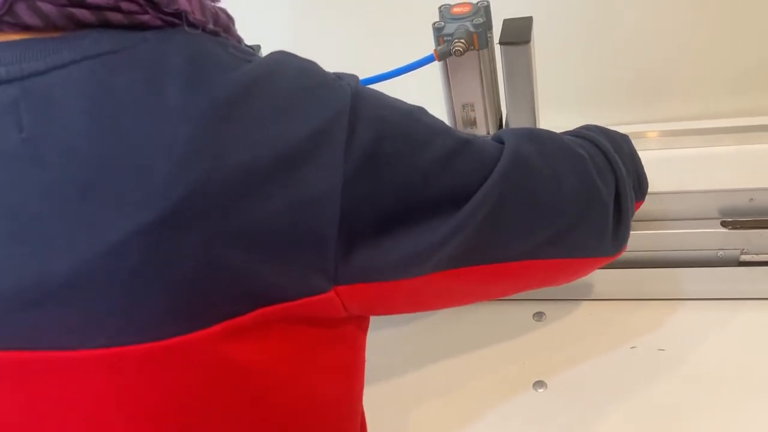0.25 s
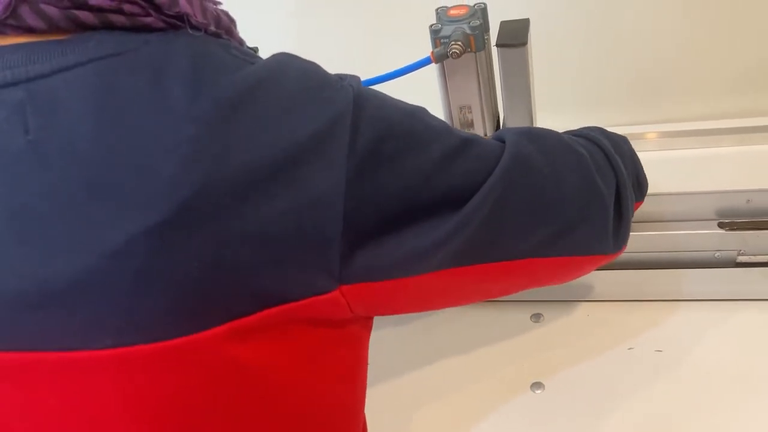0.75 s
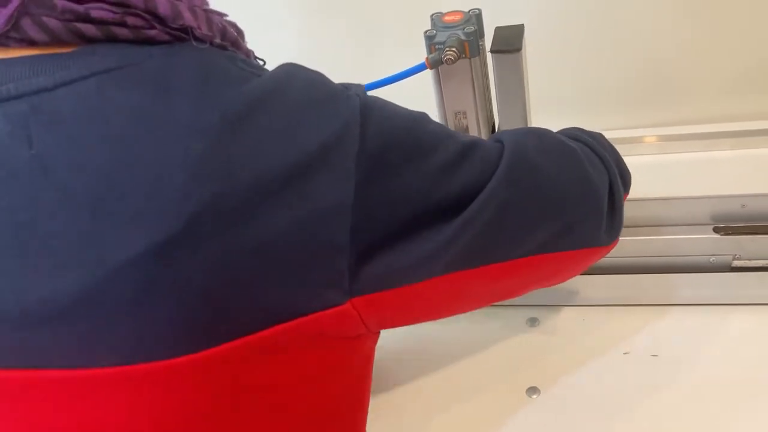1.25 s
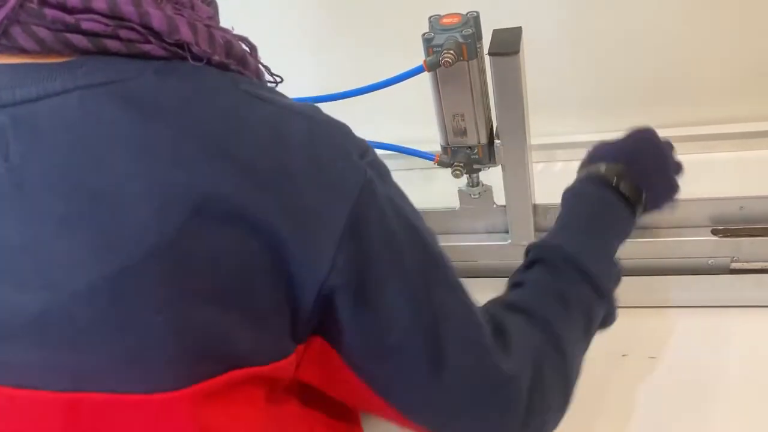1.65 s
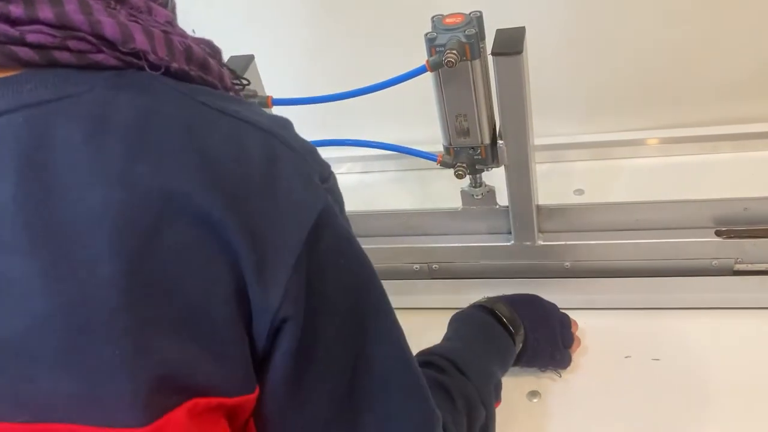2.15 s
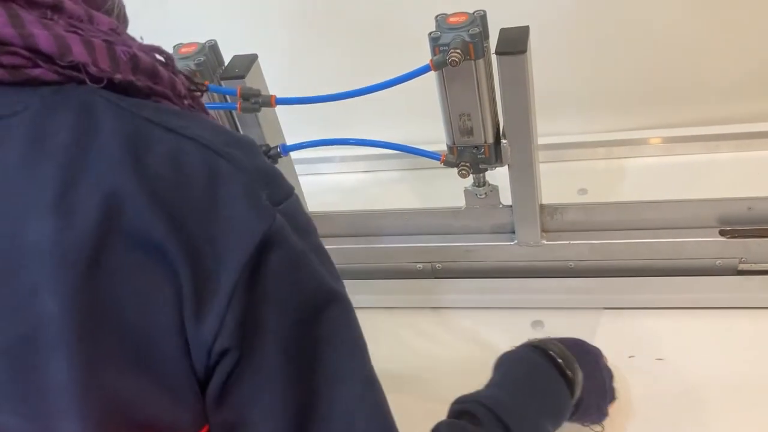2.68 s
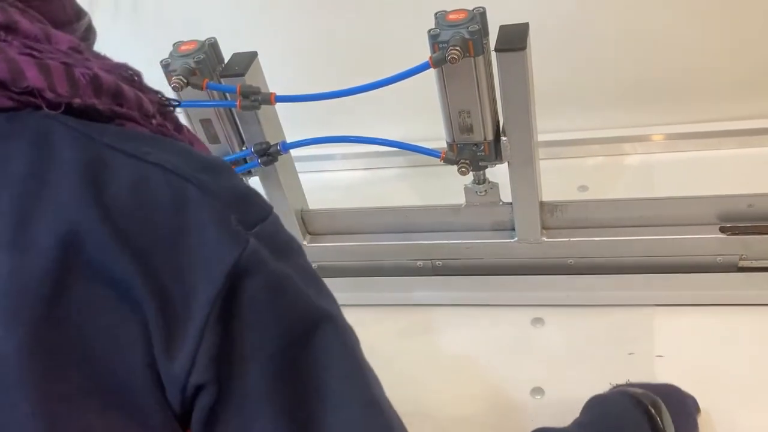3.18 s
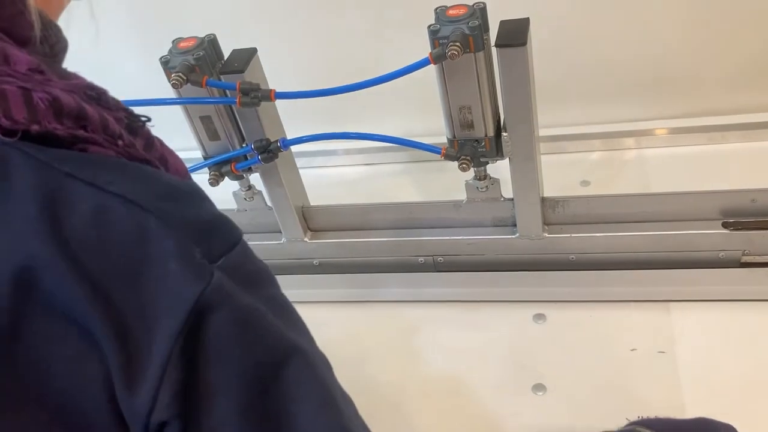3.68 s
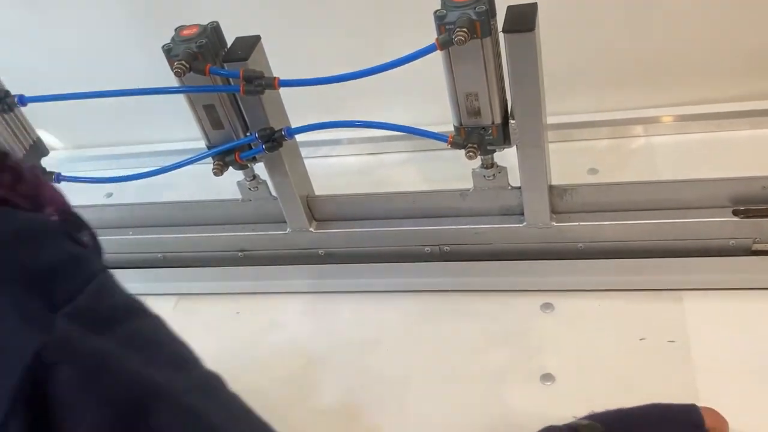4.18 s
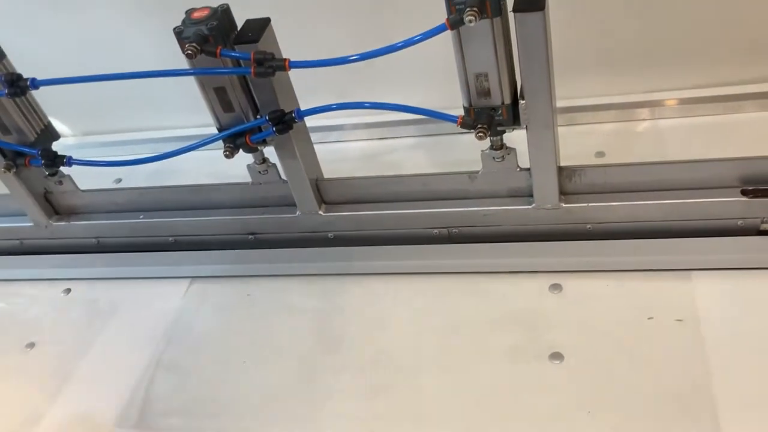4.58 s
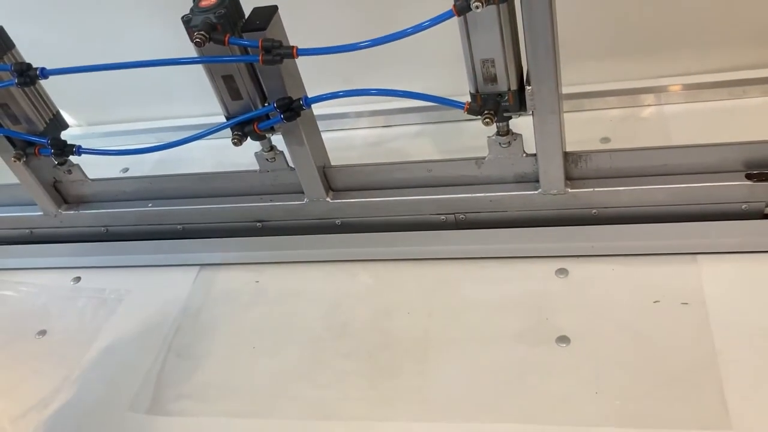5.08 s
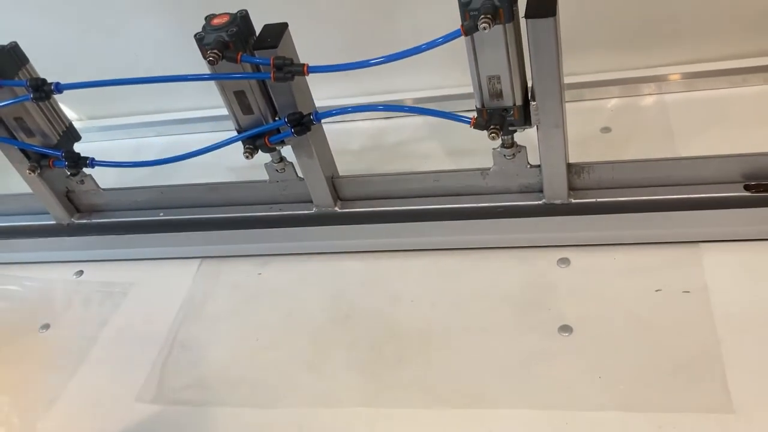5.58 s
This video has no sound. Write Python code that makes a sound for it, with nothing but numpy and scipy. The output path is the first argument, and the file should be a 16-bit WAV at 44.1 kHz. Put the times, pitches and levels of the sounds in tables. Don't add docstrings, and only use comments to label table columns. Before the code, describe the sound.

A low, faint workshop hum runs throughout, heard close up in stereo in a hard-walled room. From 0 to 2.2 seconds hands and sleeves brush plastic film: small dry fizzes, scrapes and brittle snaps in uneven strokes, with a tiny clink at 0.64, the film springing up near 1.25 and a busier cluster of creases and soft knocks around 1.4 to 1.6. A click at 2.23 leads into a quick, bright pull of the sheet across the table from 2.4, with a second tug around 3, fading by 3.7. It is nearly quiet until a pedal thumps at 4.57 with a dull metallic knock; a small clack follows at 4.94. At 5.2 valves snap open: loud airy hiss, ringing clinks and deep frame thuds. The piston rumbles and rattles around 5.5, then a second sharp burst and clunks hit at 5.67 to 5.8, still hissing at the cut-off.

```python
import sys
import numpy as np
from scipy import signal
from scipy.fft import rfft, irfft, next_fast_len
from scipy.io import wavfile
from scipy.ndimage import uniform_filter1d

SR = 44100
rng = np.random.default_rng(int(sys.argv[2]) if len(sys.argv) > 2 else 0)


def voltage_ratio(level):
    return 10 ** (np.asarray(level, float) / 20)


def dump(signal):
    limited = np.clip(np.atleast_2d(signal).T, -1, 1)
    pcm = np.round(limited * 32767).astype(np.int16)
    wavfile.write(sys.argv[1], SR, pcm)


N = 257103

# frequency_hz, density_db
FILM_SPECTRUM = [(700, -3), (2000, -2.5), (3500, -2.5), (5500, -1), (7500, 2.5), (9500, 6), (12000, -1.5),
                 (16000, -9)]
SLEEVE_SPECTRUM = [(300, 15.5), (600, 0), (1200, 6.5), (2200, 6.5), (4000, 3.5), (8000, -4.5), (16000, -50)]
DRAG_SPECTRUM = [(200, -55), (350, 3.5), (550, 0), (800, 3.5), (1500, -12), (16000, -23)]
# middle_s, half_length_s, fizz_db, scrape_db
SWEEPS = [(.002, 0.018, -58, -55), (0.053, 0.034, -72, -52), (0.143, 0.051, -62.5, -58),
          (0.195, 0.038, -56, -58.5), (0.232, 0.038, -57, -53.5), (0.312, 0.04, -55.5, -48.5),
          (0.39, 0.037, -62, -54), (0.454, 0.048, -67, -57), (0.499, 0.059, -67, -58),
          (0.71, 0.087, -61.5, -54), (0.823, 0.053, -68, -57), (0.928, 0.071, -56, -55.5),
          (1.334, 0.033, -52.5, -55), (1.4, 0.037, -60, -60), (1.444, 0.022, -59, -57.5),
          (1.513, 0.041, -53, -50), (1.712, 0.18, -59, -57.5), (1.85, 0.046, -59, -56.5),
          (1.903, 0.063, -63.5, -54.5), (2.025, 0.066, -64.5, -72), (2.22, 0.076, -65.5, -64.5),
          (2.441, 0.084, -55, -46.5), (2.915, 0.11, -65, -49.5), (3.636, 0.071, -55, -80),
          (3.918, 0.11, -72, -88), (4.17, 0.065, -66, -61.5), (4.7, 0.065, -63, -73),
          (4.945, 0.03, -63.5, -59.5), (5.182, .008, -56, -68)]
# start_s, fizz_db, scrape_db, t60_s
JOLTS = [
    (0.636, -71, -47, 0.14),
    (1.255, -54, -51, 0.28),
    (2.234, -61, -52.5, 0.96),
    (4.573, -55.5, -48.5, 0.49),
    (4.936, -52.5, -44, 0.24),
]
# time_s, speed_db
PULL = [
    (2.26, -63.5),
    (2.46, -40.5),
    (2.53, -45),
    (2.86, -47),
    (2.96, -56),
    (3.05, -52),
    (3.4, -49.5),
    (3.55, -58),
    (3.76, -70),
]
# middle_s, half_length_s, level_db
BUNDLE_DRAGS = [(0.239, 0.017, -46), (0.957, 0.024, -51), (1.15, 0.066, -62), (1.335, 0.17, -52),
                (1.488, 0.013, -38.5), (1.592, 0.04, -44.5), (1.753, 0.12, -54), (0.08, 0.043, -53),
                (1.95, .04, -64), (2.693, 0.1, -63), (3.0, 0.1, -49.5), (3.25, 0.25, -50),
                (4.15, 0.046, -56.5), (4.3, 0.088, -75)]
# shared_delay_ms, own_delay_ms, level_db
ECHOES = [(1.901, 2.6, -10), (4.3, 3.7, -9), (7.106, 8.3, -8.5), (11.28, 9.9, -9.5), (15.81, 17.2, -9.5),
          (22.48, 20.6, -11.5)]

# frequency_hz, density_db
CRACK_SPECTRUM = [(300, 6), (1000, 3.5), (3000, 0), (7000, 7.5), (12000, 1.5), (17000, 0.5)]
# start_s, crack_db, ring_db, pitch_hz
SNAPS = [(.041, -44, -43, 4370), (.130, -46, -63, 6030), (.317, -46, -43, 1600),
         (0.395, -53, -40.5, 4580), (.4575, -37.5, -46, 6500), (1.3876, -35, -46, 11000),
         (1.4189, -33.5, -45, 7400), (1.256, -42, -45, 2920), (1.482, -40, -39.5, 1730),
         (1.498, -47, -55, 3520), (1.512, -42, -60, 1510), (1.564, -45, -43.5, 1600),
         (1.593, -36.5, -47, 2840), (1.669, -54, -42.5, 7100), (1.906, -45, -36, 7860),
         (1.998, -45, -46.5, 4230), (2.233, -31, -33, 10900), (2.936, -38, -40, 1680),
         (5.683, -25, -15.5, 10900)]
# start_s, crack_db, ring_db, pitch_hz, sharpness_q
CLINKS_AND_CREASES = [(0.638, -39, -42.5, 1930, 18), (.647, -62, -49, 1990, 27), (4.573, -58, -45.5, 1445, 45),
                      (4.569, -62, -35.5, 351, 11.5), (4.572, -61, -45.5, 915, 26), (4.597, -70, -41.5, 94.8, 33),
                      (4.935, -32.5, -44, 2100, 18), (4.938, -31.5, -41, 1320, 11), (5.202, -35, -22, 7400, 29),
                      (5.2037, -36, -13.5, 7030, 67), (5.214, -38, -23, 7200, 31), (5.212, -40, -21, 1410, 6.8),
                      (5.214, -33, -25, 590, 15), (5.22, -60, -27, 270, 5.1), (5.696, -50, -27, 390, 5),
                      (4.578, -70, -39, 183, 7.5), (4.597, -70, -39, 330, 8), (5.692, -23, -28, 1450, 5),
                      (5.6735, -26, -27, 3300, 3), (5.7358, -60, -20.5, 240, 2.6), (5.782, -18, -35, 1710, 400),
                      (2.2325, -50, -43.5, 970, 2.2),
                      (0.292, -60, -45, 1800, 5), (0.3007, -55, -45, 1600, 3), (0.306, -60, -48, 1900, 5),
           (0.3135, -58, -41, 1250, 4), (0.322, -56, -48, 2500, 4), (0.643, -60, -49, 1900, 12),
           (0.650, -60, -47, 2300, 8), (1.4265, -50, -52, 6800, 4), (1.388, -60, -46, 15200, 8),
           (2.86, -60, -48, 1900, 4), (2.90, -60, -49, 1500, 4), (2.955, -60, -49, 2000, 4),
           (4.573, -70, -46, 700, 22), (4.575, -70, -49, 1620, 40), (4.578, -70, -49, 1305, 35),
           (4.574, -70, -38, 298, 14), (4.64, -70, -43, 301, 14), (5.222, -60, -31, 4800, 30),
           (5.243, -60, -32, 4800, 25), (5.694, -50, -24, 3050, 8.6), (5.676, -60, -30, 2460, 20),
           (5.698, -62, -29, 750, 5.4), (5.6735, -30, -23, 7000, 2.5), (5.6735, -50, -29, 2100, 12),
           (0.637, -46, -42, 1950, 9), (4.581, -70, -39, 180, 9), (4.662, -70, -45, 330, 12),
           (5.2225, -60, -24, 290, 5), (2.925, -60, -47, 1150, 4), (4.70, -70, -49, 190, 10),
           (5.673, -22, -24, 4400, 3), (0.6315, -60, -49, 1800, 4), (5.648, -70, -33, 105, 5),
           (5.195, -50, -48, 5900, 6), (5.784, -40, -28, 4800, 12), (5.703, -40, -27, 4000, 4)]

# frequency_hz, density_db
JET_SPECTRUM = [(300, -16.5), (900, -14.5), (1600, -8.5), (3000, -10), (4500, -2.5), (6000, -8),
                (9000, -7.5), (12000, -3.5), (13500, -17), (16000, -8)]
BURST_SPECTRUM = [(300, -12), (1500, -4.5), (2300, 1), (3400, -8), (4800, 2.5), (5700, -19), (7000, 1),
                  (12000, 1.5), (13500, -8), (16000, -6.5)]
# pitch_hz, width_hz, level_db
MUFFLER_MODES = [(2420, 120, -7.5), (3500, 98, -34), (4450, 170, -19), (5000, 1100, 3), (6240, 150, -11),
                 (6570, 190, -9), (7140, 250, 1), (8440, 590, -0.5), (10340, 480, 0), (11390, 160, -3),
                 (12600, 170, -13)]
# centre_hz, width_hz, depth (0-1)
MUFFLER_GAPS = [(3370, 450, 1), (5600, 500, .85), (3000, 1100, .55)]
# start_s, burst_db, t60_s, muffler_ring (0-1)
VALVES = [
    (5.199, -27, 0.14, 0.1),
    (5.201, -19.5, 0.18, 0.1),
    (5.215, -22.5, 0.14, 0.97),
    (5.6743, -18, 0.1, 0),
    (5.69, -19.5, 0.24, 0.3),
    (5.782, -19.5, 0.065, 0),
]
# start_s, flow_db, rise_s, sag_db_per_s
PORTS = [
    (5.199, -27.5, .045, -3),
    (5.68, -29, 0.014, -15),
]

# start_s, force_db, height (0 legs, 1 table, 2 long beams, 3 short beams), clamp_db
BLOWS = [(1.49, -47, 1.1, -59), (1.576, -40.5, 1.05, -50), (4.568, -28, 4.8, -44), (4.582, -37.5, 2.5, -41),
         (4.578, -36, 1.2, -70), (4.594, -34, 1.37, -70), (4.601, -41, 3.3, -62), (4.633, -39, 0.74, -65),
         (4.664, -44, 0.82, -64), (5.21, -23.5, 3.57, -28.5), (5.219, -19, 2.25, -33),
         (5.235, -22.5, 0.68, -43), (5.256, -18, 1.51, -31.5), (5.266, -23, 0.84, -51),
         (5.291, -43, 0.76, -37), (5.512, -33, 0.99, -31), (5.525, -32, 0.99, -27.5),
         (5.537, -27.5, 0.87, -31.5), (5.583, -34, 0.83, -38), (5.61, -39.5, 0.47, -44),
         (5.64, -34.5, 0.27, -52), (5.694, -24.5, 1.36, -21), (5.698, -21, 2.33, -28),
         (5.71, -24, 0.22, -52), (5.724, -23, 2.05, -44), (5.726, -29.5, .1, -60), (5.737, -38, 2.5, -34),
         (5.782, -36, 0.65, -27.5), (5.800, -25, 1.0, -29.5), (5.802, -37, 4.5, -60)]
# time_s, rumble_db
TRAVEL = [
    (5.199, -51),
    (5.3, -62),
    (5.4, -52),
    (5.5, -37.5),
    (5.6, -43.5),
    (5.67, -59),
    (5.72, -44.5),
    (5.78, -42),
    (5.83, -27.5),
]
# pitch_hz, level_db, t60_s
LEG_MODES = [(60.5, 7, 0.095), (76.7, 4, 0.14), (99, -8, 0.26)]
TABLE_MODES = [(153.3, -5, 0.23), (171.6, -5, 0.27)]
LONG_BEAM_MODES = [(226.5, -3.5, 0.13), (259, 5, 0.044)]
SHORT_BEAM_MODES = [(300.6, 4, 0.08), (342.4, 9, 0.12), (405, -5, 0.16), (526, -13, 0.032)]
CLAMP_MODES = [(590, 1.5, 0.015), (774, 4.5, 0.017), (920, -4.5, 0.045), (1264, 5, 0.022),
               (1395, -3.5, 0.06), (1600, -3.5, 0.071), (1710, -19, 0.24), (2000, -21, 0.12),
               (2040, -33, 0.09), (2430, -21, 0.14)]

# frequency_hz, t60_s
WALLS = [(100, 0.43), (500, 0.22), (2000, 0.32), (8000, 0.35), (16000, 0.053)]
# frequency_hz, density_db
SHOP_SPECTRUM = [(12, -23), (20, 9.5), (187, -12), (301, -7), (347, -9.5), (399, -10.5), (873, -17.5),
                 (1150, -13.5), (2080, -29.5), (7110, -78), (9140, -31), (10800, -90), (16000, -72)]
# pitch_hz, width_hz, level_db
DRONES = [(58.6, 21.5, -57), (189.2, 22.4, -56.5), (339.9, 10.5, -60.5), (1780, 160, -73)]

# frequency_hz, correlation (0-1)
PORT_LIKENESS = [(60, .9), (300, .86), (700, .5), (2000, .2), (5500, .25), (6800, .85), (8000, .7),
                 (8850, .98), (9250, .999), (9600, .97), (10300, .66), (11400, .9), (12500, .58),
                 (13200, .96), (13600, .995), (14100, .9), (14800, .55), (15700, .92)]
# frequency_hz, left_minus_right_db
PORT_BALANCE = [(60, -0.5), (300, -2), (700, 0), (3000, 1), (8000, 0)]
# frequency_hz, gain_db
MIC_RESPONSE = [(15, -36), (30, -7), (45, 0)]


def rustle():
    crackle = voltage_ratio(3.4 * np.minimum(rng.exponential(1, N), 5)) * (rng.random(N) < 700 / SR)
    crackle = signal.lfilter([1], [1, -.9], crackle) * rng.standard_normal((2, N))
    fizz = noise(FILM_SPECTRUM, patchy_db=0.3, flicker_db=0.2) + 0.42 * evened(colour(crackle, FILM_SPECTRUM))
    scrape = noise(SLEEVE_SPECTRUM, patchy_db=2.5, flicker_db=0.5)
    drag = noise(DRAG_SPECTRUM, patchy_db=3.5, flicker_db=1.5)

    film, sleeve = handling()
    pull = track(PULL, column=1) ** 2
    bundle = sum(voltage_ratio(db) ** 2 * swell(s, half) for s, half, db in BUNDLE_DRAGS)
    wander = uniform_filter1d(uniform_filter1d(rng.standard_normal(N), size=1200), size=1200)
    lumps = voltage_ratio(1.5 * evened(wander))
    table_gain = lumps * np.sqrt(voltage_ratio(-19.5) ** 2 * sleeve + voltage_ratio(-11.5) ** 2 * pull + bundle)
    fizz_gain = np.sqrt(film + pull)
    scrape_gain = np.sqrt(sleeve + voltage_ratio(-18.5) ** 2 * pull)
    return (voltage_ratio(2.5) * fizz_gain * bounced(fizz)
            + voltage_ratio(3.5) * scrape_gain * bounced(scrape)
            + voltage_ratio(-6.5) * table_gain * bounced(drag))


def handling():
    power = voltage_ratio([[-78.5], [-70]]) ** 2
    for s, half, fizz_db, scrape_db in SWEEPS:
        power = power + voltage_ratio([[fizz_db], [scrape_db]]) ** 2 * swell(s, half)
    for s, fizz_db, scrape_db, t60 in JOLTS:
        power = power + (voltage_ratio([[fizz_db], [scrape_db]]) * burst(s, t60, rise=0.0031)) ** 2
    return power


def swell(s, half):
    t = np.arange(0, N, 32) / SR
    bell = np.exp(-2 * abs((t - s) / half) ** 2.33)
    return np.repeat(bell, 32)[:N]


def bounced(x):
    taps = np.zeros((2, SR // 30))
    taps[:, 0] = 1
    for k, (*ms, db) in enumerate(ECHOES):
        taps[[0, 1], np.round(np.array(ms) * SR / 1000).astype(int)] += (-1) ** k * voltage_ratio(db)
    return signal.oaconvolve(x, taps / np.linalg.norm(taps[0]), axes=1)[:, :x.shape[1]]


def ticks():
    rows = [(*row, 4.3, 0.058 * (3000 / row[-1]) ** 0.68) for row in SNAPS]
    rows += [(*row, 0.055 + 1.7 * row[4] / row[3]) for row in CLINKS_AND_CREASES]
    length = 9000
    out = np.zeros((2, N + length))
    spray = rng.standard_normal((40, 2, length))
    t = np.arange(length) / SR
    for (s, crack_db, ring_db, hz, sharp, t60), hiss in zip(rows, [*spray, *spray[:, ::-1]]):
        crack = evened(colour(hiss, CRACK_SPECTRUM)) * voltage_ratio(crack_db - 60 * t / .007)
        struck = np.sin(2 * np.pi * hz * t + [[0], [np.pi / 2]]) * np.exp(-np.pi * hz / sharp * t)
        scuff = evened(resonate(hiss, hz, hz / min(sharp, 12))) * voltage_ratio(-60 * t / t60)
        rise = 1 - np.exp(-t / 0.00084)
        start = round(s * SR)
        out[:, start:start + length] += crack + voltage_ratio(ring_db) * rise * (2.17 * struck + 0.79 * scuff)
    return out[:, :N]


def air():
    jet = noise(JET_SPECTRUM, patchy_db=2.0, flicker_db=0.9, size=256, count=SR)
    blast = noise(BURST_SPECTRUM, patchy_db=4.0, flicker_db=0.0, size=256, count=SR)
    for hz, width, depth in MUFFLER_GAPS:
        blast = blast - depth * resonate(blast, hz, width)
    white = rng.standard_normal((2, SR))
    rings = evened(sum(voltage_ratio(db) * resonate(white, hz, width) / np.sqrt(width) for hz, width, db in MUFFLER_MODES))
    steady = flow() * bounced(jet + 0.63 * rings)
    pops = sum(voltage_ratio(db) * burst(s, t60, rise=t60 / 120)[-SR:] * (blast + ring * rings)
               for s, db, t60, ring in VALVES)
    return np.pad(steady + pops, ((0, 0), (N - SR, 0)))


def flow():
    now = np.arange(N - SR, N) / SR
    power = 0
    for s, db, rise, sag_db in PORTS:
        t = np.maximum(now - s, 0)
        opening = 1 - np.exp(-(t / rise) ** 2)
        power = power + (opening * voltage_ratio(db + sag_db * t)) ** 2
    return np.sqrt(power)


def frame():
    out, t, blows = np.zeros((2, N)), np.arange(SR // 2) / SR, np.array(BLOWS)
    push = burst(0, 0.0023, rise=0.00038)[:SR // 10]
    rattle = burst(0, 0.042, rise=0.00075)[:SR // 10]
    travel = track(TRAVEL, column=1)
    at = np.round(blows[:, 0] * SR).astype(int)
    reach_db = [blows[:, 1] - 13.5 * (blows[:, 2] - height) ** 2 for height in range(4)] + [blows[:, 3]]
    families = [(LEG_MODES, .4), (TABLE_MODES, .35), (LONG_BEAM_MODES, .12), (SHORT_BEAM_MODES, .1),
                (CLAMP_MODES, .03)]
    for force_db, (modes, sliding) in zip(reach_db, families):
        force = np.bincount(at, voltage_ratio(force_db), N)
        rough = 0.89 * signal.oaconvolve(force, rattle)[:N] + sliding * travel
        shake = rough * rng.standard_normal((2, N))
        solid = 1.31 * signal.oaconvolve(force, push)[:N]
        drive = shake + [solid, np.roll(solid, 40)]
        ring = sum(voltage_ratio(db - 60 * t / t60) * np.sin(2 * np.pi * hz * t) for hz, db, t60 in modes)
        out += signal.oaconvolve(drive, ring[None], axes=1)[:, :N]
    return voltage_ratio(-22.5) * out


def room(x):
    taps = np.zeros((2, SR // 2))
    at = np.arange(300, SR // 2 - 20, 20) + rng.integers(0, 20, (2, (SR // 2 - 301) // 20))
    np.put_along_axis(taps, at, rng.choice([-1., 1.], at.shape), 1)
    hz, t, z = signal.stft(taps, SR, nperseg=256)
    tail = signal.istft(z * voltage_ratio(-60 * t / read(WALLS, hz)[:, None]), SR, nperseg=256)[1]
    return signal.oaconvolve(x, tail / np.linalg.norm(tail[0]), axes=1)[:, :N]


def shop():
    drones = sum(voltage_ratio(db) * evened(resonate(rng.standard_normal((2, N)), hz, width)) for hz, width, db in DRONES)
    return voltage_ratio(-52.5) * noise(SHOP_SPECTRUM, patchy_db=3.0, flicker_db=1.0, size=2048) + drones


def evened(x):
    return x / np.sqrt(np.mean(x ** 2) + 1e-20)


def read(points, hz):
    f, value = np.transpose(points)
    return np.interp(np.log(hz + 1), np.log(f + 1), value)


def track(rows, column):
    rows = np.array(rows)
    return voltage_ratio(np.interp(np.arange(N) / SR, rows[:, 0], rows[:, column], left=-150, right=-150))


def colour(x, points):
    size = next_fast_len(x.shape[-1])
    gain = voltage_ratio(read(points, np.fft.rfftfreq(size, 1 / SR)))
    return irfft(rfft(x, size) * gain, size)[..., :x.shape[-1]]


def resonate(x, hz, width):
    return signal.lfilter(*signal.iirpeak(hz, hz / width, SR), x)


def noise(points, patchy_db, flicker_db, size=512, count=N):
    frames, hz = 4 * count // size + 5, np.fft.rfftfreq(size, 1 / SR)
    a, b, c, d, patches = rng.standard_normal((frames, len(hz), 5)).T
    patches = evened(uniform_filter1d(uniform_filter1d(patches, size=8, axis=0), size=12, axis=1))
    flicker = evened(uniform_filter1d(rng.standard_normal(frames), size=4))
    level_db = read(points, hz)[:, None] + patchy_db * patches + flicker_db * flicker
    z = np.array([a + 1j * b, c + 1j * d]) * voltage_ratio(level_db)
    return evened(signal.istft(z, nperseg=size, noverlap=3 * size // 4)[1][:, :count])


def burst(s, t60, rise):
    out, start = np.zeros(N), round(s * SR)
    t = np.arange(N - start)[:SR // 2] / SR
    out[start:start + len(t)] = (1 - np.exp(-t / rise)) * voltage_ratio(-60 * t / t60)
    return out


def scene():
    near = ticks() + air() + frame()
    return near + voltage_ratio(-9) * room(near) + rustle() + shop()


def low_pass(x):
    return signal.sosfilt(signal.butter(12, 17080, fs=SR, output="sos"), x)


def record(dry):
    size = next_fast_len(N + SR // 2)
    hz = np.fft.rfftfreq(size, 1 / SR)
    edge_db = -62 / (1 + np.exp(np.minimum((15880 - hz) / 60, 50)))
    shared, own = rfft(dry, size) * voltage_ratio(read(MIC_RESPONSE, hz) + edge_db)
    same = read(PORT_LIKENESS, hz)
    tilt = voltage_ratio(read(PORT_BALANCE, hz) / 2)
    lead = 2 * np.pi * np.maximum(hz - 2610, 0) / 4410 - 0.77 * np.exp(-((hz - 900) / 600) ** 2)
    left = shared * tilt
    right = (same * shared + np.sqrt(1 - same ** 2) * own) * np.exp(1j * lead) / tilt
    mix = irfft(np.array([left, right]), size)[:, :N]
    return low_pass(mix)


dry = scene()
out = record(dry)
dump(out)
```